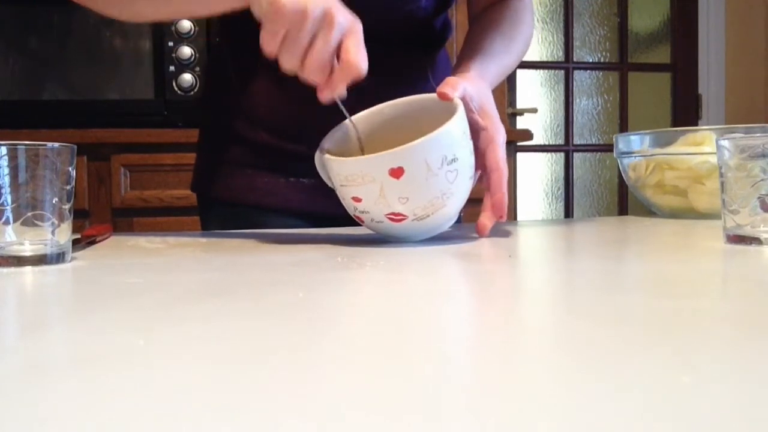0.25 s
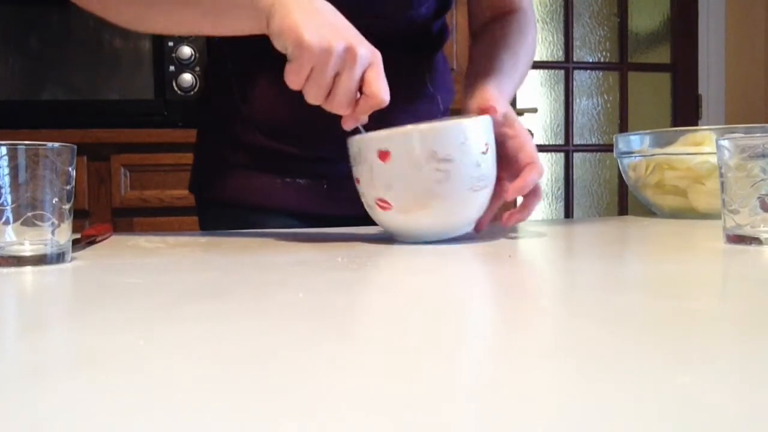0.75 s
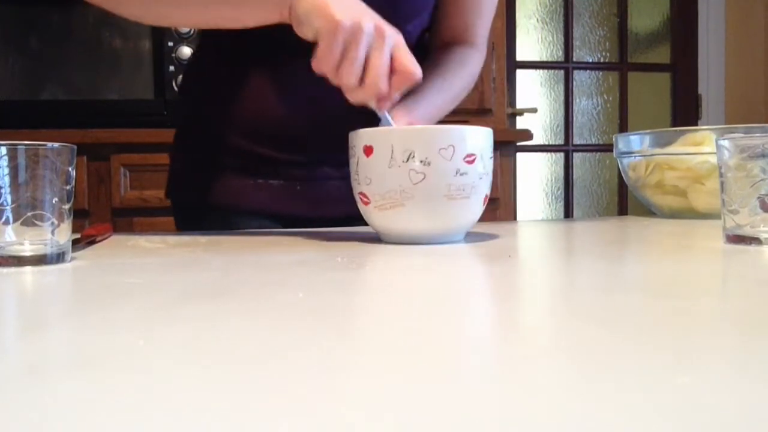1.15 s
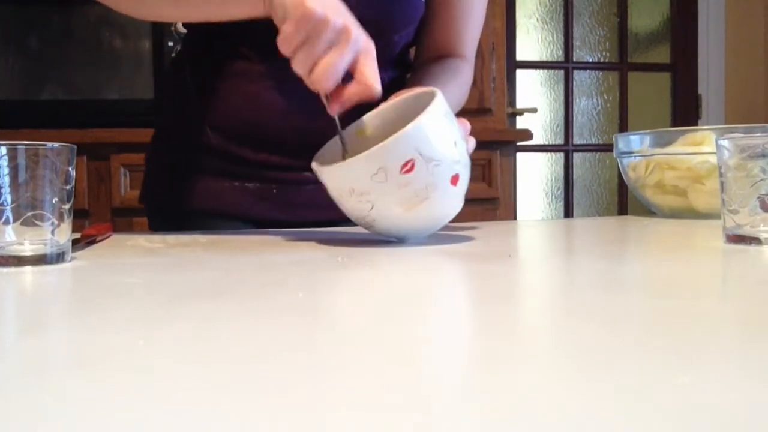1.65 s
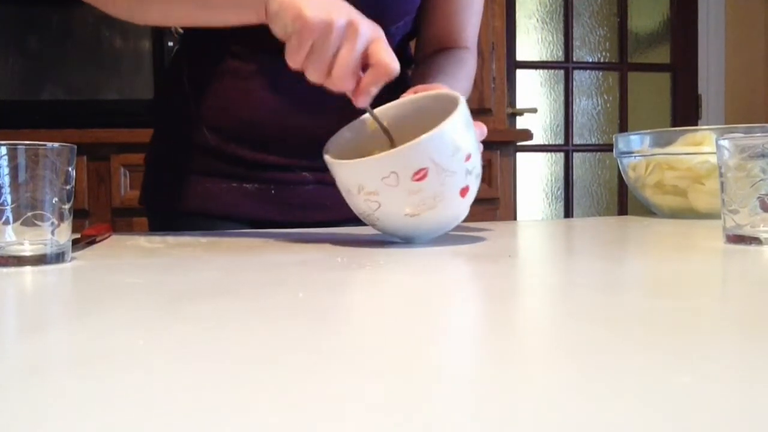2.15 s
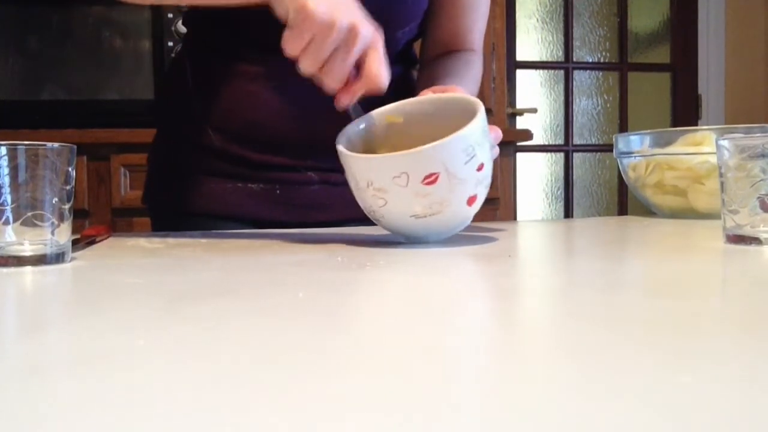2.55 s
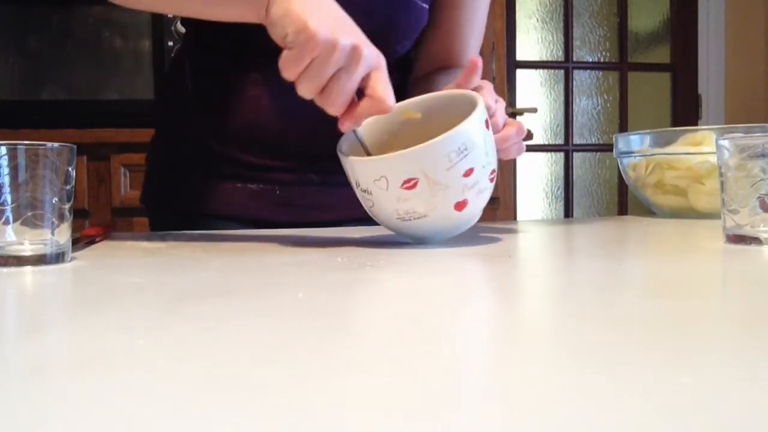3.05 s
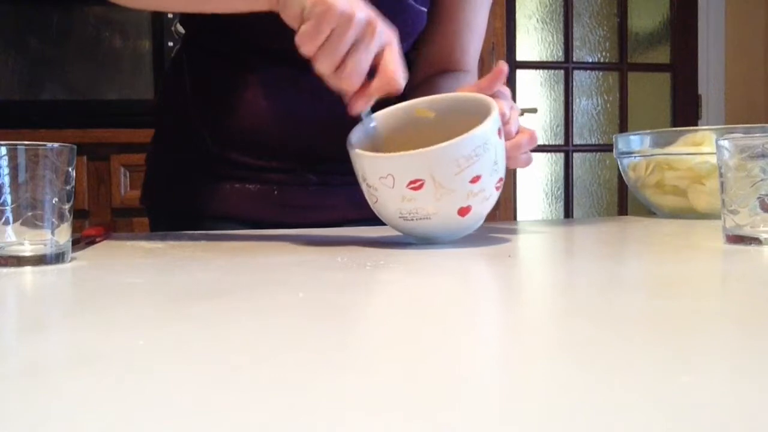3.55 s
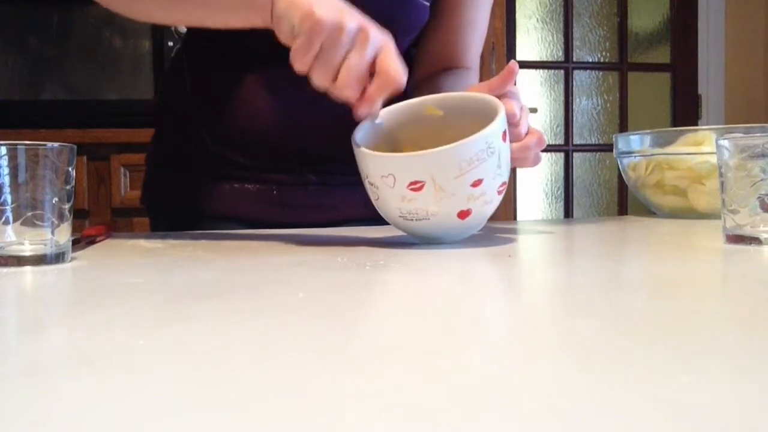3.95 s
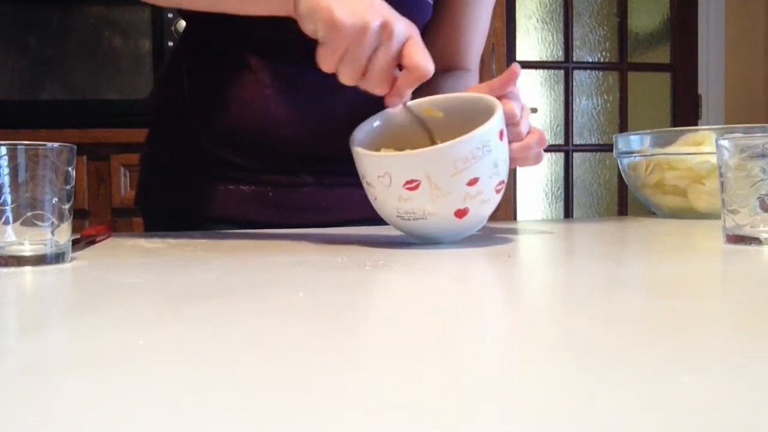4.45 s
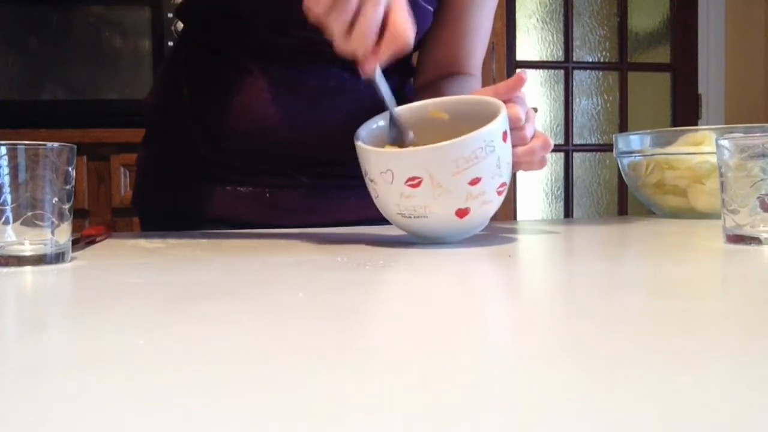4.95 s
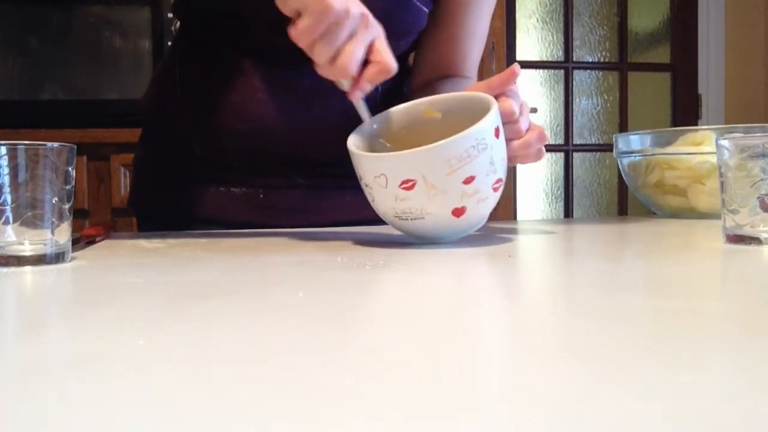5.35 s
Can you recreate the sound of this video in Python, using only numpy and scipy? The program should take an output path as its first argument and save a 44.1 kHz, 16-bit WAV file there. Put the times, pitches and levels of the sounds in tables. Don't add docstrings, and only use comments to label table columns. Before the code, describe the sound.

A metal fork mashes soft fruit in a ceramic bowl, with a few hard ringing clinks, a wooden bowl-on-table clatter and faint scrapes.

```python
import sys
import numpy as np
from scipy import signal
from scipy.fft import rfft, irfft
from scipy.io import wavfile
from scipy.ndimage import uniform_filter1d

SR = 44100
rng = np.random.default_rng(int(sys.argv[2]) if len(sys.argv) > 2 else 0)


def to_linear_factor(level_db):
    exponent = np.asarray(level_db, float) / 20
    return 10 ** exponent


def dump_mix(stems):
    frames = np.atleast_2d(stems).T
    limited = np.clip(frames, -1, 1)
    pcm = np.round(limited * 32767).astype(np.int16)
    wavfile.write(sys.argv[1], SR, pcm)


N = 247158

# start in seconds, peak in dB, share that keeps ringing,
# crack in dB, shiver of the fork in dB.
CLINKS = [
    (0.375, -8, 0.067, -4, -48),
    (0.3917, -13.5, 0.19, -3, -31),
    (0.851, -7, 0.61, 0, -35),
    (3.3992, -14.5, 0.92, -5.5, -15),
    (5.1873, -8.5, 0.45, -9, -13.5),
]
GRIPS = [0, 0, 1, 2, 3]
# delay after the blow in seconds, share left.
DAMPING = [(.15, .8), (0.16, .8), (0.05, .02), (0.048, .3), (0.14, 0.86)]
RING_HZ = [
    [1752, 1804, 2662, 3327, 4349, 4479, 4592, 6602, 6660, 8230, 8857, 10770, 13300, 14880],
    [1658, 1950, 3063, 3677, 4484, 5809, 6584, 7494, 7784, 8866, 9313, 10780, 14830],
    [1771, 1832, 2950, 4334, 4450, 5820, 6385, 6690],
    [1335, 1760, 2400, 3700, 4468, 4618, 6765, 6878, 7617, 8533, 8888, 11400, 12650, 14940],
]
# level in dB, t60 in seconds.
RINGS = [
    [(-10.5, 0.13), (-20, 0.065), (-5, .03), (-17, 0.072), (-10, .06), (2, .22), (-6, 0.037), (-17, .1),
     (-10.5, .1), (-14, .08), (-14.5, 0.09), (-20, 0.054), (-14.5, .04), (-7.5, 0.045)],
    [(1, .45), (2, 0.023), (-5.5, 0.017), (-22.5, 0.038), (-11, .07), (-12, 0.048), (-3, .2),
     (-20.5, 0.087), (-17.5, 0.11), (-3, .02), (-9, .02), (-19.5, .04), (-25.5, .1)],
    [(-0.5, .16), (-9, .1), (-1.5, 0.017), (-9, .06), (-4, .015), (6.5, 0.0076), (10.5, .0083), (4, 0.012)],
    [(-16, 0.13), (-7.5, 0.33), (1, 0.024), (-12, 0.073), (-4, .28), (-8.5, .2), (-2.5, .14), (-9, 0.11),
     (2.5, 0.054), (0, 0.059), (-8.5, 0.045), (-5.5, .08), (1, .2), (-16.5, .12)],
]
# start in seconds, contact in dB, tine in dB, tip over tine in dB.
TAPS = [(0.1003, -43, -35.5, -2), (0.225, -43.5, -42.5, -26), (0.6233, -44.5, -39, 2.5),
        (0.751, -34.5, -47.5, -17), (1.41, -70.5, -60.5, 16), (1.4968, -61, -52, 11.5),
        (1.719, -50.5, -73, -2), (1.736, -55, -67, 16), (1.8817, -42.5, -28.5, 1.5),
        (2.109, -48.5, -44.5, -28), (2.2, -46, -84, 8), (2.215, -63, -54, 14.5),
        (2.2523, -42.5, -30.5, 4.5), (2.2951, -40, -31.5, 1), (2.338, -60, -49, 17.5),
        (2.3579, -39.5, -38, -7), (2.4742, -45, -46.5, -2.5), (2.5085, -43.5, -47.5, 7),
        (2.5885, -46.5, -46, 0), (2.6083, -57, -56.5, 19), (3.0001, -69, -40, 6.5), (3.053, -38, -26, 1.5),
        (3.787, -57.5, -54, 6.5), (3.808, -43, -30.5, 1), (4.101, -38.5, -39, 8.5), (4.2107, -65, -33, 6),
        (4.5046, -38.5, -30.5, 6.5), (4.694, -42, -44.5, 12), (4.813, -31, -24.5, 3),
        (5.4476, -34, -41, 13.5)]
# start in seconds, contact in dB, tip in dB.
TICKS = [(1.69, -72, -45), (2.902, -49.5, -86), (3.236, -57.5, -72.5), (3.447, -65, -32.5),
         (3.651, -69, -54), (3.7, -53, -56), (3.738, -59, -46.5), (4.0067, -58.5, -69),
         (4.087, -57.5, -52.5), (4.6575, -58.5, -43), (5.5964, -45, -44.5)]
# start in seconds, rim in dB, wall in dB.
PINGS = [(0.753, -54, -76), (1.2412, -93, -55), (1.879, -67, -51), (2.356, -43.5, -41), (3.053, -43.5, -47),
         (3.8073, -60, -57), (4.1, -46, -40), (4.212, -73, -62), (4.5029, -52, -44.5), (4.697, -54, -51),
         (4.812, -72, -42.5), (5.4483, -44, -46)]
RIM_HZ = [1772, 1815]
WALL_HZ = [4478, 4600, 4400]
# level in dB, t60 in seconds.
RIM = [(-1, 0.11), (-5.5, 0.02)]
WALL = [(7, 0.038), (2, 0.015), (-5.5, 0.044)]
# pitch in Hz, level in dB, t60 in seconds.
TINE = [(5750, -2, .005), (6150, 0, .008), (6600, -3, .005)]
TIP = [(8800, -7, .003), (11200, -1, .003), (12600, -3, .003), (14600, -3, .003)]
# start in seconds, peak in dB.
KNOCKS = [(0.375, -39), (0.842, -22.5), (0.893, -7), (0.901, -9.5), (0.914, -10), (0.928, -28.5),
          (1.449, -30.5), (1.479, -38.5), (1.525, -34), (1.879, -49), (2.251, -40), (3.054, -29),
          (3.448, -39.5), (3.805, -35.5), (4.21, -42.5), (4.503, -38), (4.696, -38.5), (4.815, -31.5),
          (5.187, -29), (5.445, -40.5)]
# level in dB, t60 in seconds.
TABLE_HZ = [140, 208, 269, 328, 398, 458, 533, 651, 727, 845, 1082, 1200, 1319, 1410]
TABLE = [(-11, 0.15), (-5, 0.3), (2, 0.32), (2.5, 0.29), (-5.5, 0.54), (1, 0.35), (-3, 0.35), (0, 0.55),
         (-5, 0.4), (-1, 0.55), (-5, 0.6), (-10, 0.11), (-7.5, 0.23), (-10, 0.15)]
# moment of most pressure in seconds, foot on table in dB,
# fork in fruit in dB, tines on glaze in dB.
STROKES = [(0.02, -61.5, -61.5, -55.5), (0.18, -59.5, -69, -90), (0.56, -67, -62, -65),
           (0.82, -68.5, -75, -62), (1.52, -51.5, -57.5, -63.5), (1.96, -54, -60, -60.5),
           (2.42, -59.5, -59.5, -59.5), (2.72, -56, -65, -68), (2.97, -60.5, -77, -68.5),
           (3.57, -61, -58, -68.5), (3.9, -64.5, -64.5, -84.5), (4.27, -58, -72, -59.5),
           (4.41, -66, -60.5, -80), (4.57, -86, -84, -61.5), (4.77, -57.5, -66.5, -65.5),
           (5.35, -72, -70, -55.5)]
# foot, fruit, glaze in dB per second.
BUILD_DB_S = [68, 61.5, 70.5]
EASE_DB_S = [57, 62, 49]
# foot, fruit, glaze in dB, then both rates in dB per second.
LANDING_DB = [-22.5, -32.5, -62]
ROCK_DB_S = [185.5, 267, 95]
SETTLE_DB_S = [232, 156.5, 83]
# frequency in Hz, level in dB per Hz.
FOOT = [(35, -73.5), (60, -58.5), (130, -29), (177, -9), (274, -5), (794, -15.5), (870, -2), (1250, -34.5),
        (1730, -10), (4500, -51.5), (5850, -58.5), (9900, -120)]
MASH = [(350, -30.5), (600, 7), (776, 0.5), (878, 0), (1730, -1.5), (2000, -3.5), (2690, -4), (7000, -14),
        (9100, -40.5), (15400, -120)]
GLAZE = [(1470, -26), (2500, 3.5), (3060, -5.5), (6600, -0.5), (9440, -8), (14000, -2.5), (15500, -10),
         (16000, -67.5)]
SQUISH_HZ = (314, 2580)
# start in seconds, level in dB.
HUMS = [
    (2.258, -51.5),
    (4.205, -54.5),
    (4.699, -50),
    (4.814, -56.5),
    (5.191, -52),
]
# start in seconds, length in seconds, level in dB,
# first pitch in Hz, last pitch in Hz.
RIM_SONGS = [
    (0, 0.051, -65.5, 1740, 1770),
    (1.58, 0.13, -60, 1775, 1778),
    (1.906, 0.27, -67, 1723, 1780),
    (2.025, 0.06, -58, 1720, 1790),
    (2.35, 0.088, -75, 1750, 1775),
    (4.497, 0.11, -74, 1730, 1777),
    (4.088, 0.091, -77, 1800, 1740),
    (5.252, 0.2, -52, 1770, 1760),
    (5.416, 0.12, -62.5, 1765, 1765),
]
WALL_SONGS = [
    (4.097, 0.1, -49, 4650, 4330),
    (5.27, 0.053, -41.5, 4740, 4500),
    (6.2, 0.11, -44.5, 4600, 4430),
    (5.3, 0.103, -44.5, 4500, 4480),
    (5.37, 0.11, -41, 4500, 4450),
    (4.7, .12, -60.5, 4480, 4450),
    (5.345, 0.11, -41, 1690, 1760),
    (5.33, .11, -50, 1900, 2250),
]
# start in seconds, length in seconds, level in dB,
# pitch in Hz, width in Hz.
SCUFFS = [(0.39, 0.034, -55, 644, 400), (0.78, 0.07, -55, 2140, 1700), (0.548, 0.048, -64.5, 804, 200),
          (2.265, 0.12, -61, 2260, 900), (2.297, 0.093, -65.5, 790, 500), (2.52, 0.13, -66, 2600, 1210),
          (2.725, 0.096, -64, 870, 350), (4.7, 0.062, -56.5, 750, 600), (5.195, 0.15, -57, 3610, 400),
          (0.888, 0.033, -24.5, 1080, 1190), (1.398, 0.12, -51.5, 1630, 2090),
          (1.759, 0.07, -63, 1040, 300), (3.445, 0.29, -75, 710, 505), (4.272, 0.058, -59, 2210, 410),
          (4.28, 0.077, -59, 755, 710), (4.281, 0.071, -54, 3370, 503), (4.537, 0.017, -65, 880, 119),
          (4.56, 0.092, -75, 860, 120), (4.355, 0.1, -74, 900, 250), (4.52, 0.058, -56.5, 6140, 900),
          (5.186, 0.017, -35.5, 2020, 880), (4.719, 0.022, -61, 3160, 2000), (5.335, .115, -46, 1850, 700),
          (5.443, 0.018, -45.5, 6500, 500)]
# start in seconds, rise in seconds, fade in seconds, level in dB.
WIPES = [
    (3.39, 0.002, .008, -51),
    (1.41, 0.0039, 0.074, -57),
    (1.758, 0.0081, 0.046, -45.5),
    (2.607, 0.00084, 0.023, -51),
    (2.999, 0.0014, 0.011, -51),
    (4.3, 0.04, 0.024, -33.5),
    (4.73, 0.0083, 0.014, -42),
]
# start in seconds, pitch in Hz, level in dB, t60 in seconds.
POPS = [(0.102, 2600, -52, .02), (.195, 5200, -47, 0.016), (.235, 2060, -57, 0.024),
        (0.862, 3063, -20, .02), (1.882, 2650, -47, .05), (2.2008, 2030, -43, 0.013),
        (2.1994, 905, -51.5, 0.013), (2.215, 5500, -60, 0.013), (2.2514, 6100, -35, 0.023),
        (2.2532, 2420, -43, 0.025), (2.288, 3600, -38.5, 0.042), (2.315, 2440, -46, 0.018),
        (2.331, 4700, -46, 0.016), (2.4594, 2470, -51, .01), (2.4727, 5250, -45.5, .012),
        (2.506, 1510, -48.5, .015), (2.55, 2860, -54, 0.0092), (2.589, 4470, -48.5, 0.019),
        (2.611, 2200, -62, 0.016), (4.284, 1010, -52, 0.016), (4.296, 3350, -47, .02),
        (4.323, 2370, -40, 0.021), (4.326, 790, -42.5, 0.021), (4.328, 3260, -44, 0.018),
        (4.332, 4560, -41, .02), (4.529, 2500, -45, 0.019), (4.53, 6100, -40, .03),
        (4.542, 850, -43, 0.024), (4.615, 2020, -61, .01), (4.663, 921, -51, .02),
        (4.663, 2000, -52, 0.011), (4.705, 544, -45, 0.036), (4.71, 3270, -42, .015),
        (4.712, 4670, -46, .025), (4.729, 910, -46, 0.023), (4.742, 3000, -45, .012),
        (4.753, 880, -49, .025), (4.102, 1740, -44, 0.038), (4.813, 6180, -29.5, 0.02),
        (4.815, 2500, -42, .03), (5.417, 4405, -33, .035)]
# frequency in Hz, t60 in seconds.
KITCHEN = [(150, 0.33), (500, 0.47), (1500, 0.34), (4000, 0.38), (8000, 0.34), (15000, 0.24)]
# delay in seconds, level in dB.
ECHOES = [(.0021, -22), (.0065, -13.5), (.0118, -20), (.0155, -13), (.0195, -18.5), (.026, -26)]
# frequency in Hz, level in dB per Hz.
AIR = [(18, -63), (30, -24), (90, -8), (190, 1), (283, 5), (349, 0), (675, -8.5), (1750, -10),
       (1940, -21.5), (3960, -17.5), (4520, -11), (14400, -15.5), (16500, -41.5)]


def evened(x):
    return x / np.sqrt(np.mean(x ** 2) + 1e-20)


def read(points, hz):
    f, value = np.transpose(points)
    return np.interp(np.log(hz + 1), np.log(f + 1), value)


def add(mix, s, sound):
    part = mix[round(s * SR):][:len(sound)]
    part += sound[:len(part)]


def pitched(hz, rows):
    return [(f, *row) for f, row in zip(hz, rows)]


def coloured(x, spectrum):
    gain = to_linear_factor(read(spectrum, np.fft.rfftfreq(N, 1 / SR)))
    return evened(irfft(rfft(x) * gain, N))


def ring(modes, seconds, detune, scatter_db, rise, blur=0):
    t = np.arange(round(seconds * SR)) / SR
    hz, db, t60 = np.transpose(modes)[:, :, None]
    luck = rng.standard_normal((60, 2))[:len(modes)].T[:, :, None]
    wander = 0
    if blur:
        walk = np.cumsum(rng.standard_normal((len(modes), len(t))), axis=1)
        wander = blur * (hz / SR) * (hz / 7000) * walk
    decay = to_linear_factor(db + scatter_db * luck[0] - 60 * t / np.clip(t60, .002, .9))
    tones = decay * np.sin(2 * np.pi * hz * (1 + detune * luck[1]) * t + wander)
    sound = tones.sum(0) * (1 - np.exp(-t / rise))
    return sound / abs(sound).max()


def crack(low_hz, high_hz, fade):
    t = np.arange(900) / SR
    band = signal.butter(2, [low_hz, min(high_hz, 20000)], "bandpass", fs=SR)
    burst = rng.standard_normal(900) * np.exp(-t / fade)
    burst = signal.lfilter(*band, signal.lfilter(*band, burst))
    return burst / abs(burst).max()


def clinks():
    rings, cracks = np.zeros((2, N))
    shiver_band = signal.butter(2, [3800, 14500], "bandpass", fs=SR)
    for (s, db, held, crack_db, shiver_db), grip, (stop, left) in zip(CLINKS, GRIPS, DAMPING):
        modes = pitched(RING_HZ[grip], RINGS[grip])
        damped = [(hz, d, min(t60, 900 / hz)) for hz, d, t60 in modes]
        twins = [(1.018 * hz, d - 2, 0.068 * t60) for hz, d, t60 in damped]
        twins += [(.978 * hz, d - 3, 0.085 * t60) for hz, d, t60 in damped]
        tone = ring(damped + twins, 0.5, 0, 0, 0.0014, blur=.4)
        t = np.arange(len(tone)) / SR
        tone = tone * (1 - (1 - left) / (1 + np.exp(-(t - stop) / 0.0021)))
        quick_drop = held + (1 - held) * np.exp(-t / 0.012)
        add(rings, s, to_linear_factor(db) * tone * quick_drop)
        add(cracks, s, to_linear_factor(db + crack_db) * crack(2000, 15500, 0.0017))
        shiver = signal.lfilter(*shiver_band, rng.standard_normal(len(t))) * np.exp(-t / 0.0068)
        add(cracks, s, to_linear_factor(db + shiver_db) * shiver)
    return rings, cracks


def taps():
    out = np.zeros(N)
    ticks = [(s, db, tip_db - 14.5, 12) for s, db, tip_db in TICKS]
    for s, crack_db, tine_db, over_db in TAPS + ticks:
        tip_db = tine_db + over_db
        add(out, s, to_linear_factor(crack_db) * crack(1690, 3400, 0.0026))
        add(out, s, to_linear_factor(tine_db) * ring(TINE, .05, 0.0033, 3.5, 0.00021))
        add(out, s, to_linear_factor(tip_db) * ring(TIP, .05, .04, 1.0, 0.004))
        add(out, s, to_linear_factor(tine_db - 3.5) * crack(4500, 6800, 0.00053))
        add(out, s, to_linear_factor(tip_db) * crack(7300, 22000, 0.0012))
    for s, rim_db, wall_db in PINGS:
        add(out, s, to_linear_factor(rim_db) * ring(pitched(RIM_HZ, RIM), .3, 0.0018, 2.2, 0.00048))
        add(out, s, to_linear_factor(wall_db) * ring(pitched(WALL_HZ, WALL), .3, 0.0064, 1.6, 0.0012))
    return out


def knocks():
    out = np.zeros(N)
    corner_hz = 613
    modes = [(hz, d - 10 * np.log10(1 + (hz / corner_hz) ** 4), 0.28 * t60 * min(1, 300 / hz))
             for hz, d, t60 in pitched(TABLE_HZ, TABLE)]
    push = np.hanning(round(0.0031 * SR))
    for s, db in KNOCKS:
        add(out, s, to_linear_factor(db) * ring(modes, .3, 0.0048, 3.9, 0.001))
        add(out, s, to_linear_factor(db - 8.5) * crack(0.51 * corner_hz, 2.14 * corner_hz, 0.0024))
        add(out, s, to_linear_factor(db - 12.5) * push)
    return out


def pressure(rows, build, ease):
    t, power = np.arange(0, N + 64, 64) / SR, 0
    for s, *db in rows:
        slope = np.where(t < s, -np.abs(build)[:, None], np.abs(ease)[:, None])
        power = power + to_linear_factor(np.array(db)[:, None] - slope * (t - s)) ** 2
    return [np.interp(np.arange(N) / SR, t, line) for line in power]


def squish():
    per_s, cycles = 260, 7.2
    size = to_linear_factor(3.1 * rng.exponential(1, N).clip(0, 4)) * (rng.random(N) < per_s / SR)
    kind, out = rng.integers(0, 16, N), np.zeros(N)
    for k, hz in enumerate(np.geomspace(*SQUISH_HZ, num=16)):
        u = np.arange(0, 1, hz / cycles / SR)
        blip = np.sin(2 * np.pi * cycles * u * (1 + 0.21 * u)) * u ** 0.25 * (1 - u) ** 2
        out += signal.oaconvolve(size * (kind == k), blip)[:N]
    return evened(out)


def slips(spread_db, per_s):
    size = to_linear_factor(spread_db * rng.exponential(1, N).clip(0, 4))
    return size * rng.standard_normal(N) * (rng.random(N) < per_s / SR)


def rubbing():
    pushes = pressure(STROKES, BUILD_DB_S, EASE_DB_S)
    landing = pressure([(0.916, *LANDING_DB)], ROCK_DB_S, SETTLE_DB_S)
    foot, mash, glaze = np.sqrt(np.add(pushes, landing))

    foot_slips = slips(4.5, 3500)
    table = ring(pitched(TABLE_HZ, TABLE), .2, 0, 0, 0.00018)
    table = table * np.exp(-np.arange(len(table)) / SR / 0.0063)
    body = signal.oaconvolve(foot_slips, table)[:N]
    rumble = 0.89 * evened(body) + 0.41 * coloured(foot_slips, FOOT)

    lumps = to_linear_factor(0.69 * evened(uniform_filter1d(rng.standard_normal(N), 900)))
    fruit = lumps * coloured(slips(0.95, 8100), MASH) + to_linear_factor(-5) * squish()
    scrape = coloured(slips(1.5, 20000), GLAZE)
    return foot * rumble + mash * fruit + glaze * scrape


def resonate(x, hz, width):
    turn = np.exp(2j * np.pi * np.cumsum(hz) / SR)
    r = np.exp(-np.pi * width / SR)
    return 2 * (turn * signal.lfilter([1 - r], [1, -r], x / turn)).real


def slides():
    out = np.zeros(N)
    rows = [(s, 0.094, db, 211, 211, 11) for s, db in HUMS]
    rows += [(*row, 13) for row in RIM_SONGS]
    rows += [(*row, 223) for row in WALL_SONGS]
    rows += [(s, length, db, hz, hz, width) for s, length, db, hz, width in SCUFFS]
    for s, length, db, from_hz, to_hz, width in rows:
        luck = rng.standard_normal((3, round(np.clip(length, .02, .24) * SR)))
        u = np.linspace(0, 1, luck.shape[1])
        hz = from_hz + (to_hz - from_hz) * u
        grit = luck[0] * to_linear_factor(1.8 * luck[2].clip(-2.5, 2.5) ** 2)
        tone = evened(resonate(resonate(grit, hz, 0.72 * width), hz, 1.14 * width))
        grip = to_linear_factor(1.5 * evened(uniform_filter1d(luck[1], 300)))
        add(out, s, to_linear_factor(db) * tone * grip * signal.windows.tukey(len(u), .5))
    return out


def wipes():
    hiss, level = coloured(rng.standard_normal(N), GLAZE), np.zeros(N)
    t = np.arange(SR // 4) / SR
    for s, rise, fade, db in WIPES:
        add(level, s, to_linear_factor(db) * (1 - np.exp(-(t / rise) ** 2)) * np.exp(-t / fade))
    return level * hiss


def pops():
    out = np.zeros(N)
    for s, hz, db, t60 in POPS:
        tones = [(hz, 0, t60), (1.05 * hz, -6, .55 * t60), (.95 * hz, -6, .55 * t60)]
        add(out, s, to_linear_factor(db) * ring(tones, .1, 0.0027, 1.3, 0.00088))
    return out


def kitchen(x):
    sparse = np.zeros(SR // 2)
    at = np.arange(440, SR // 2 - 12, 12)
    sparse[at + rng.integers(0, 12, len(at))] = rng.choice([-1., 1.], len(at))
    hz, t, z = signal.stft(sparse, SR, nperseg=256)
    decay = to_linear_factor(-60 * t / read(KITCHEN, hz)[:, None])
    tail = signal.istft(z * decay, SR, nperseg=256)[1]
    tail = to_linear_factor(-3.5) * tail / np.linalg.norm(tail)
    for k, (s, db) in enumerate(ECHOES):
        tail[round(s * SR)] += (-1) ** k * to_linear_factor(db)
    return signal.oaconvolve(x, tail)[:N]


def room_air():
    return to_linear_factor(-66.5) * coloured(rng.standard_normal(N), AIR)


def scene():
    rings, cracks = clinks()
    near = cracks + taps() + knocks() + slides() + wipes() + pops()
    to_walls = near + to_linear_factor(-2.5) * rings
    return (near + rings + kitchen(to_walls) + rubbing() + room_air())[None]


def top_cut(x):
    return signal.sosfilt(signal.butter(12, 16610, fs=SR, output="sos"), x)


def record(dry):
    bass_cut = signal.butter(14, 126, "highpass", fs=SR, output="sos")
    cut = signal.sosfilt(bass_cut, dry) + to_linear_factor(-25.5) * dry
    edge = signal.oaconvolve(cut, signal.firwin(255, 15400, fs=SR)[None], "same")
    return top_cut(edge + to_linear_factor(-41.5) * cut)


dry = scene()
out = record(dry)
dump_mix(out)
```